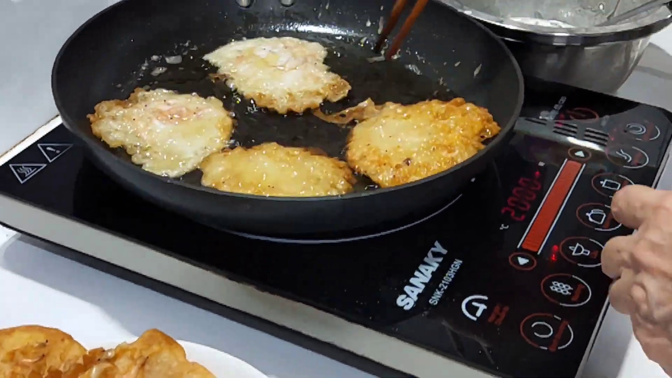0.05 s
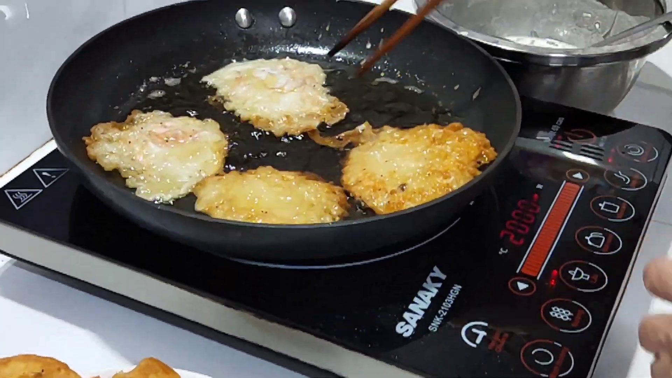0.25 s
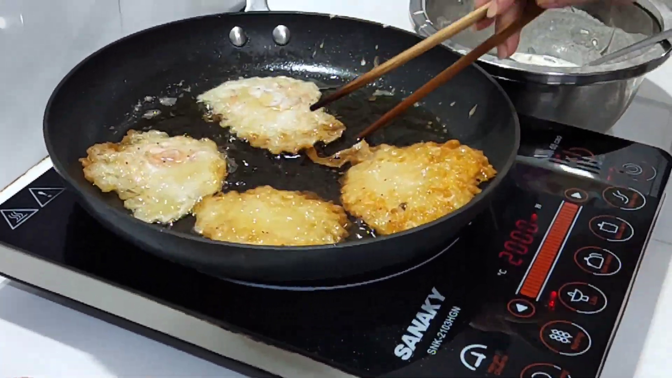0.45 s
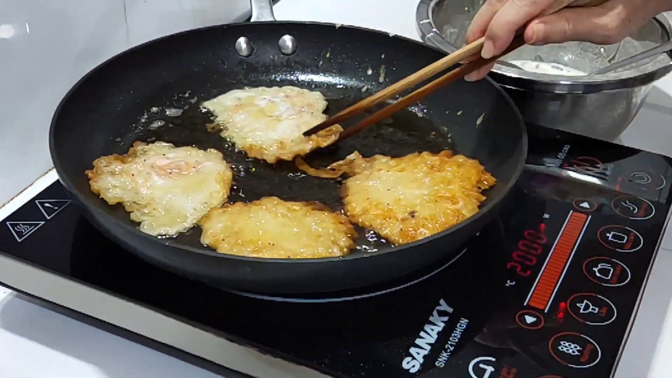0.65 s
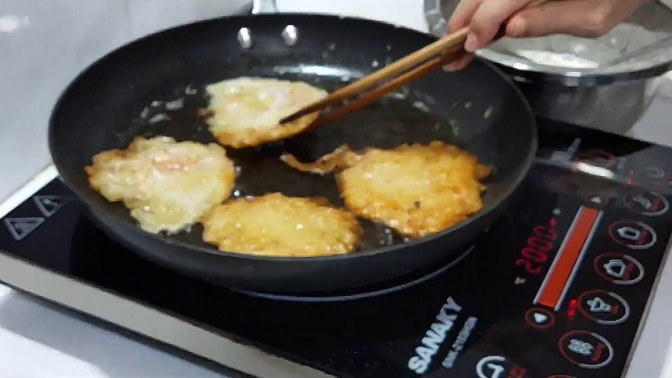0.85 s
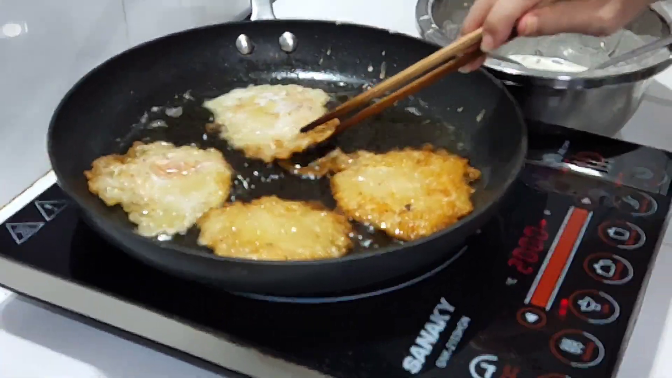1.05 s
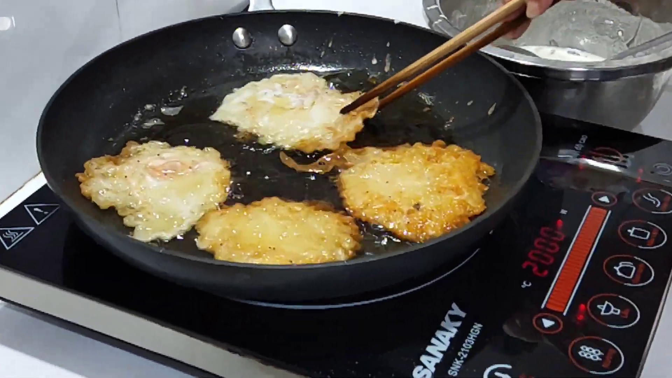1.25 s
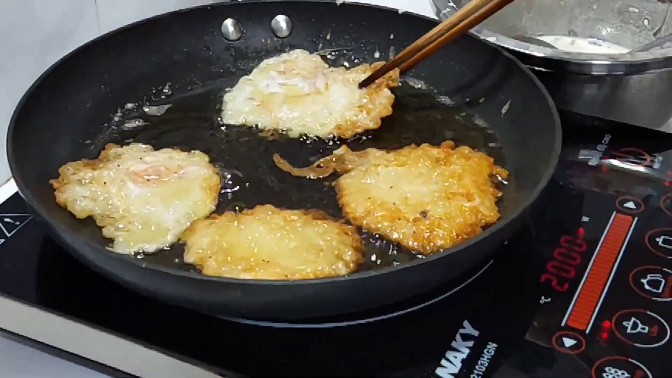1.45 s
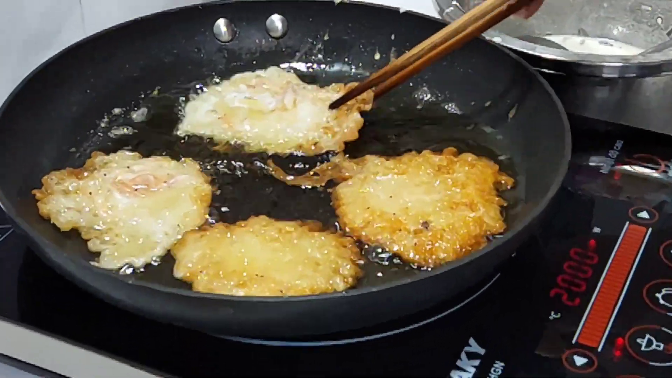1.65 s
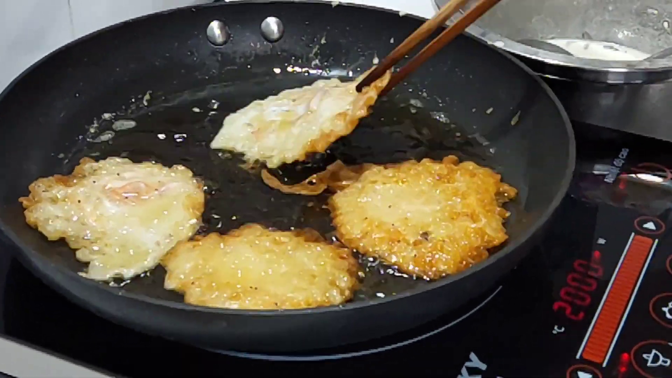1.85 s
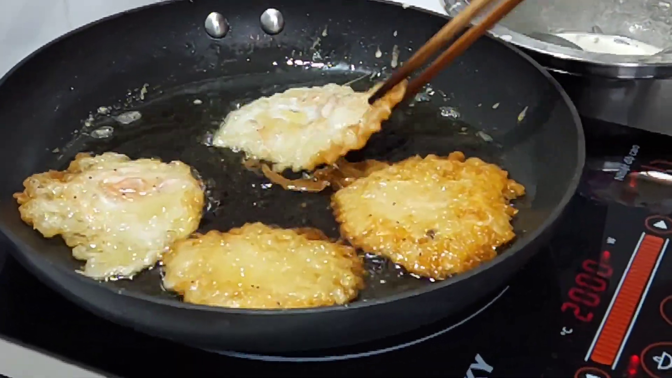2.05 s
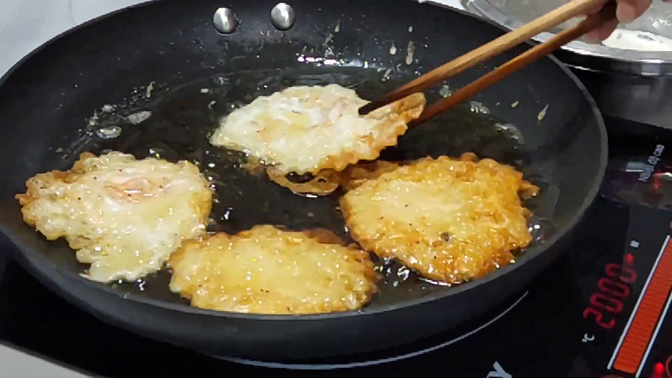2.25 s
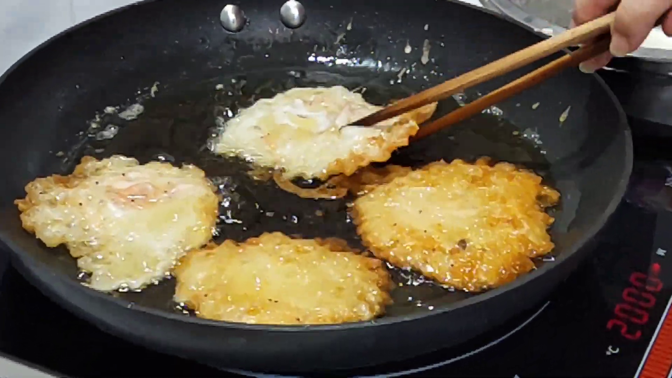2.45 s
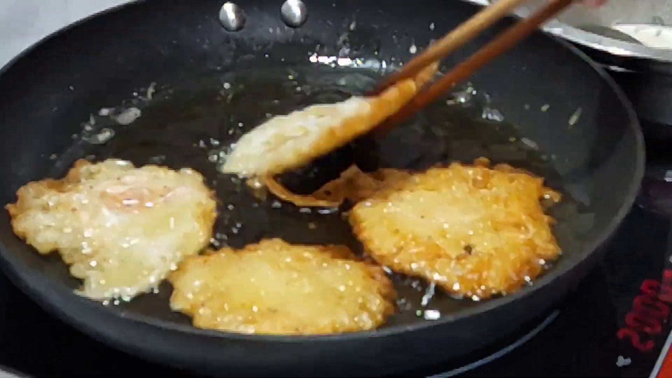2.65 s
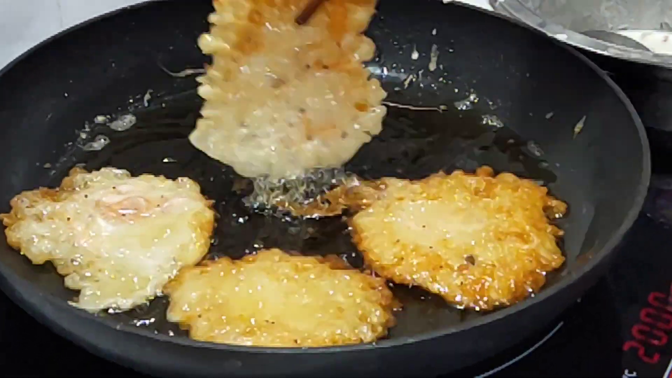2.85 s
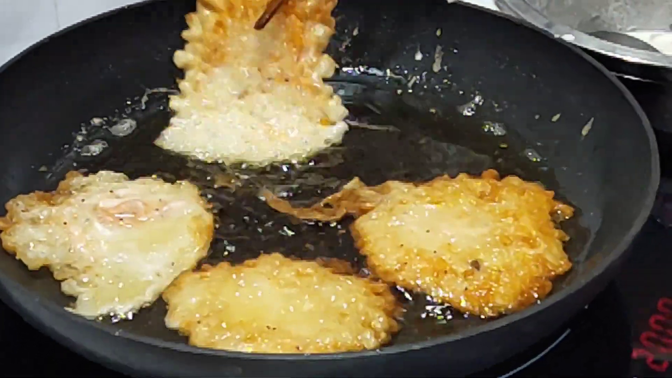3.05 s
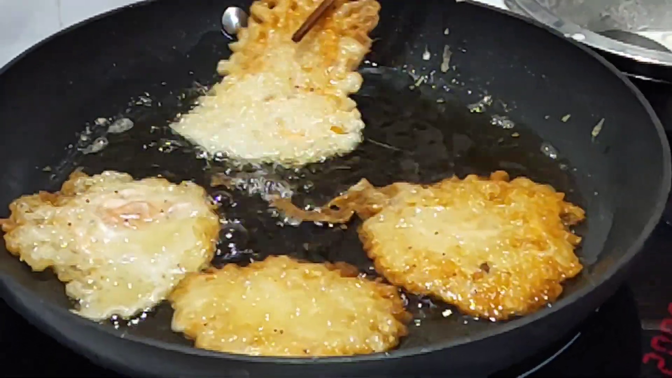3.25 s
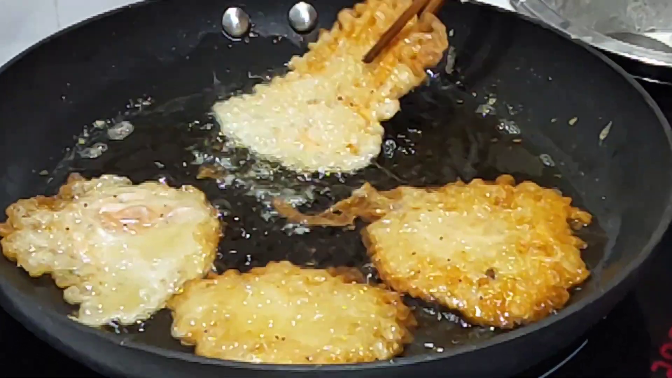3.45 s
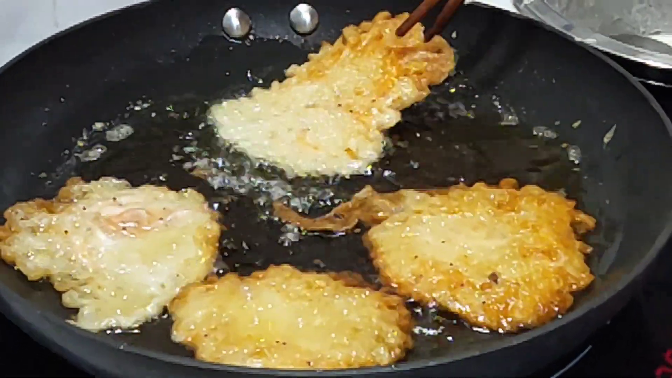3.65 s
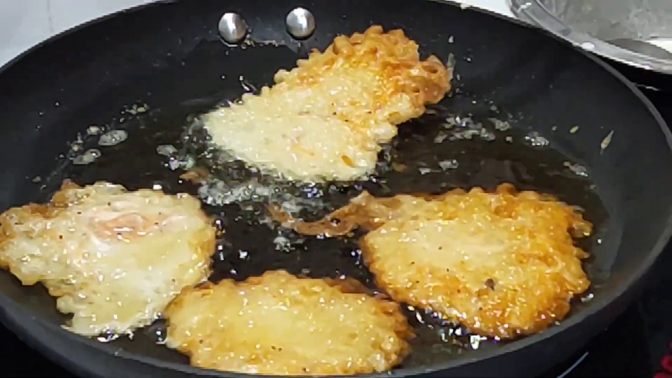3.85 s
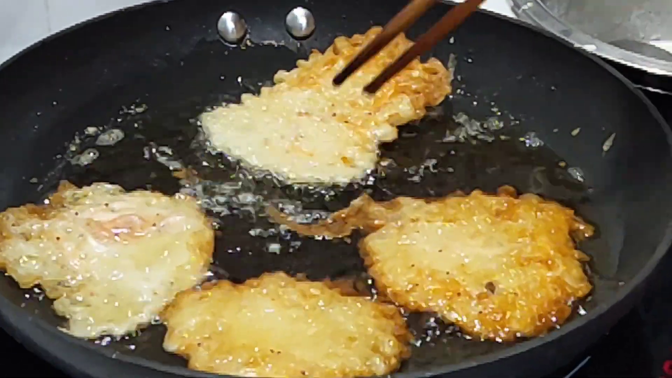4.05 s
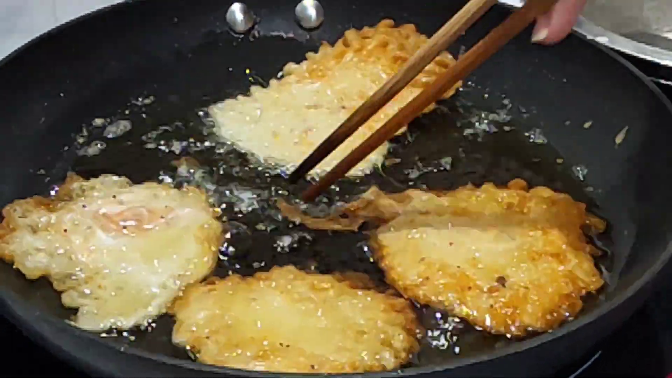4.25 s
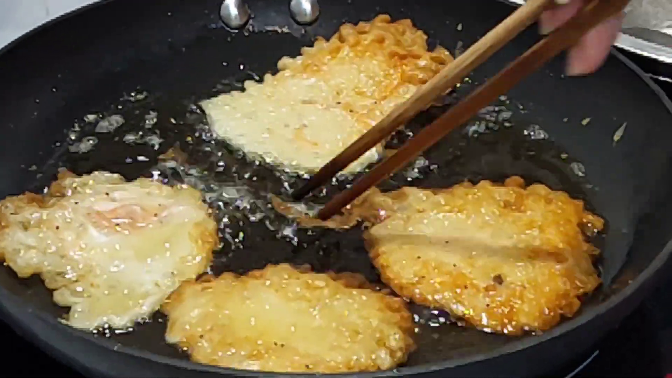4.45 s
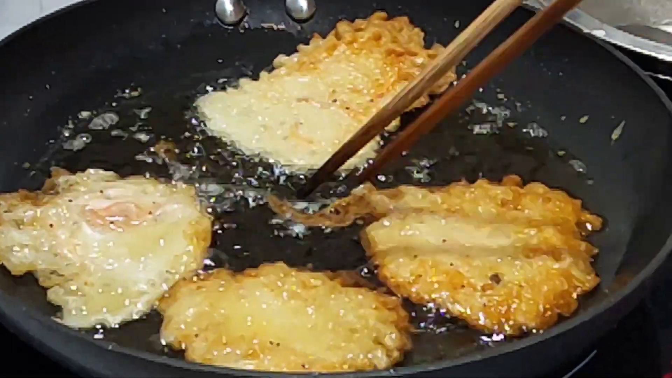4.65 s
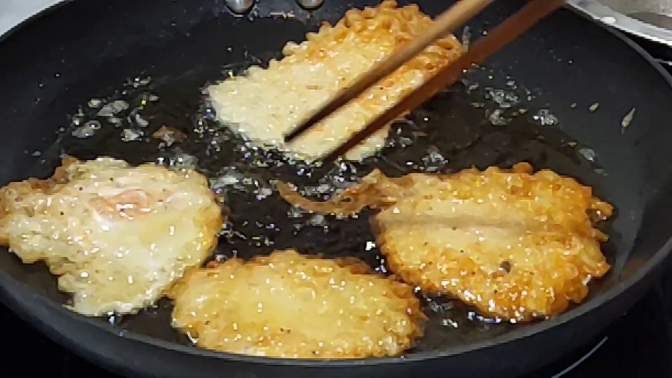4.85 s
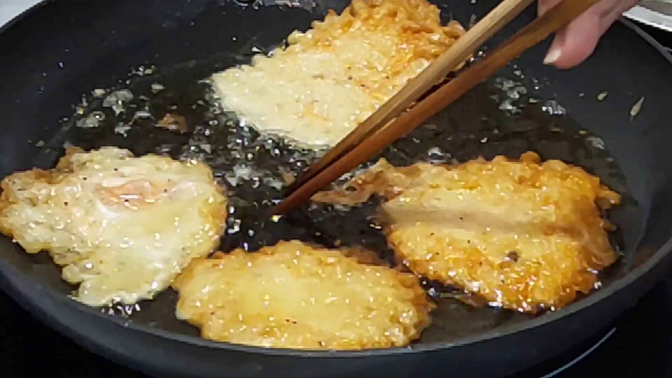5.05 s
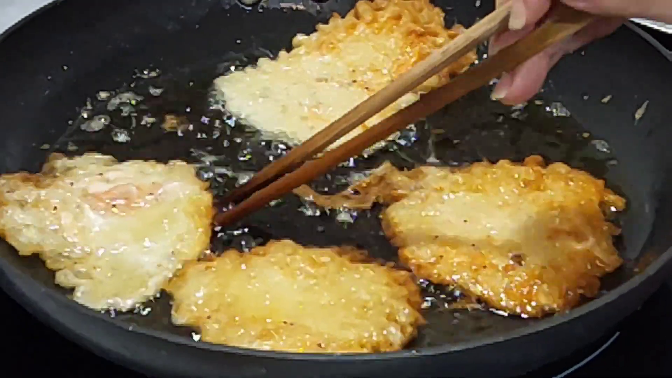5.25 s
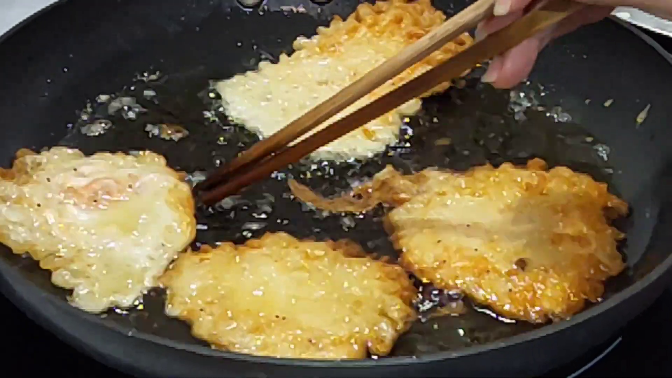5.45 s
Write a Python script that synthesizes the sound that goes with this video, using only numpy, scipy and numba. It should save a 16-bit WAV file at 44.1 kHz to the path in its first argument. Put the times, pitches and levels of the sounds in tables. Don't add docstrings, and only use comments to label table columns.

```python
import sys
import numpy as np
from scipy import signal
from scipy.fft import rfft, irfft
from scipy.io import wavfile
from scipy.ndimage import uniform_filter1d
from numba import njit

SR = 44100
rng = np.random.default_rng(int(sys.argv[2]) if len(sys.argv) > 2 else 0)


def how_loud(loudness_db):
    steps = np.asarray(loudness_db, float) / 20
    return 10 ** steps


def to_wav(sig):
    pcm = np.clip(np.atleast_2d(sig), -1, 1) * 32767
    pcm = np.round(pcm).astype(np.int16)
    wavfile.write(sys.argv[1], SR, pcm.T)


N = 242991
T = np.arange(N) / SR
HZ = np.fft.rfftfreq(N, 1 / SR)


def set_rms(x, db):
    return x * how_loud(db) / np.sqrt(np.mean(x ** 2))


def across(table, hz):
    table_hz, value = np.transpose(table)
    return np.interp(np.log(hz + 1), np.log(table_hz + 1), value)


def walk(rate_hz):
    hold = int(SR / rate_hz)
    levels = rng.standard_normal(int(60 * N / SR))[:N // hold + 1]
    steps = np.repeat(levels, hold)
    return 0.933 * uniform_filter1d(uniform_filter1d(steps, hold), hold)[:N]


# hz, likeness (0-1)
PORT_LIKENESS = [(30, 0.6), (120, 0.9), (240, 0.95), (490, 0.86), (1000, 0.42), (2000, 0)]


def diffuse_pair(gain):
    like = np.clip(across(PORT_LIKENESS, HZ), 0, 1)
    mid, side = rfft(rng.standard_normal((2, N))) * gain * np.sqrt([1 + like, 1 - like])
    return irfft(np.array([mid + side, mid - side]), N)


# start_s (centre), level_db (peak), length_s
SWELLS = [
    (0.309, -52.5, 0.075),
    (0.894, -47.5, 0.3),
    (1.544, -51.5, 0.2),
    (2.56, -52, 0.13),
    (3.387, -51.5, 0.074),
    (4.583, -41, 0.26),
    (5.235, -47, 0.25),
]


def rumble():
    band = 1 / (1 + ((HZ - 85) / 22) ** 4)
    swells = sum(how_loud(db) * np.exp(-((T - s) / length) ** 2) for s, db, length in SWELLS)
    floor_db = -69
    return set_rms(diffuse_pair(band), -6.5) * (how_loud(floor_db) + swells)


# hz, level_db (per Hz)
FAN_AIR = [(12, -40), (30, -19), (70, -25.5), (150, -22.5), (190, -13), (350, -8.5), (395, -14.5),
           (440, -11), (600, -11), (800, -9.5), (990, -19), (1100, -24.5), (1630, -20), (3000, -34.5)]
# pitch_hz, width_hz, level_db
FAN_CASING = [(69.6, 4.9, -13.5), (90.4, 2.3, -15), (238.5, 18, -5), (302, 29, -4.5), (329.6, 9.7, -5.5),
              (410, 40, -8.5), (464.3, 10.3, -4), (523.3, 6.1, -4.5), (725, 73, -13), (816, 5.5, -10),
              (921.6, 11, -8)]


def fan_air():
    rings = sum(how_loud(db) ** 2 / (1 + (2 * (HZ - hz) / width) ** 4) for hz, width, db in FAN_CASING)
    colour = np.sqrt(how_loud(across(FAN_AIR, HZ)) ** 2 + rings)
    return set_rms(diffuse_pair(colour), -34.5) * how_loud(0.6 * walk(3))


# pitch_hz, level_db (rms)
FAN_TONES = [
    (200.3, -48.5),
    (407.5, -43),
    (968.3, -53),
]


def fan_tones():
    tones = 0
    for hz, db in FAN_TONES:
        flicker_db, drift = 2.2 * walk(16), 0.004 * walk(5)
        phase = 2 * np.pi * np.cumsum(hz * (1 + drift)) / SR
        tones = tones + np.sqrt(2) * how_loud(db + flicker_db) * np.sin(phase)
    return tones


# pitch_hz, level_db, t60_s
BOWL = [(1562, -22.5, 0.086), (1890, -4.5, 0.036), (2100, -0.5, 0.046), (2515, -14, 0.12),
        (2785, -5, 0.054), (3080, -6.5, 0.059)]


def paths(bowl_db, rim_db, rim_t60, kitchen_db, kitchen_t60, lags, count):
    t = np.arange(SR // 2) / SR

    def fade(t60):
        return np.exp(-np.log(1000) * t / t60)

    tail = how_loud(rim_db) * fade(rim_t60) + how_loud(kitchen_db) * fade(kitchen_t60)
    h = rng.standard_normal((count, 2, len(t))) * tail
    swell = 1 - np.exp(-t / 0.0019)
    for hz, db, t60 in BOWL:
        own_hz = hz * (1 + 0.0094 * rng.standard_normal((count, 2, 1)))
        turns = own_hz * t + rng.random((count, 2, 1))
        h += how_loud(bowl_db + db) * swell * fade(t60) * np.sin(2 * np.pi * turns)
    lag = (lags * rng.random((count, 2))).astype(int)
    h[np.arange(count)[:, None], np.arange(2), lag] += 1
    return h


@njit
def burst(s, hz, gain, spot, cycles, swell, glide, out):
    for e in range(len(s)):
        start = int(s[e] * SR) + 1
        for i in range(start, min(start + int(cycles[e] * SR / hz[e]), out.shape[2])):
            age = (i / SR - s[e]) * hz[e] / cycles[e]
            phase = 2 * np.pi * age * cycles[e] * (1 + glide * age)
            v = (1 - np.exp(-age / swell)) ** 2 * np.exp(-6 * age) * np.sin(phase)
            out[spot[e], 0, i] += gain[0, e] * v
            out[spot[e], 1, i] += gain[1, e] * v
    return out


def bubbles(s, db, hz, pan_db, snap_db, snap_hz, cycles, swell, glide, way, count=4):
    chance = rng.random((len(s), 2 + 2 * count)).T
    gain = how_loud(db + np.array([pan_db, -pan_db]) / 2)
    spot = (chance[0] * len(way)).astype(int)
    own_cycles = cycles * (0.5 + 0.87 * chance[1])
    dry = burst(s, hz, gain, spot, own_cycles, swell, glide, np.zeros((len(way), 2, N)))
    snap_gain = gain * how_loud(snap_db - 2.0)
    for k, (late, pitch) in enumerate(chance[2:].reshape(count, 2, -1)):
        pitch = (k + pitch) / count
        own_hz = snap_hz * (0.62 + 0.8 * pitch)
        dry = burst(s + 0.003 * late, own_hz, snap_gain, spot, 8.0 + 0 * s, 0.074, 0.2, dry)
    return signal.fftconvolve(dry, way, axes=2)[..., :N].sum(0)


def fizz(sizes, boil_db, pan_db, scatter_db, patchy_db, cycles, way, count):
    when, pitch, luck, side = rng.random((count, 4)).T
    s = when * (N - 1) / SR
    hz = sizes[0][0] * (sizes[-1][0] / sizes[0][0]) ** pitch
    loud_db = np.minimum(-scatter_db * np.log(luck), 4.5 * scatter_db)
    patch_db = patchy_db * walk(35)[(s * SR).astype(int)]
    db = across(sizes, hz) + loud_db + patch_db
    x = bubbles(s, db, hz, 6 * (side - 0.5), -17.5, 5500.0, cycles, 0.039, 0.23, way, count=1)
    return set_rms(x, 0) * how_loud(boil_db + np.array([pan_db, -pan_db]) / 2)


# pitch_hz, level_db
FINE = [(2800, -21), (3400, -15.5), (4300, -1), (5000, -1), (5600, -4.5), (6500, 5.5), (7500, 0.5),
        (8500, 4.5)]
# pitch_hz, level_db
COARSE = [(900, -14.5), (1300, -14.5), (1700, 3.5), (2100, 2.5), (2600, -4.5), (3300, 4)]


def whole_pan_fizz(vigour_db):
    wide = paths(-32.5, -26.5, 0.047, -45, 0.23, lags=30, count=7)
    pan_db = -4.5 - 0.07 * vigour_db
    fine_db = -46 + vigour_db
    coarse_db = -49 + 0.6478 * vigour_db
    fine = fizz(FINE, fine_db + 2.0, pan_db, 3.1, 0.97, 9.1, wide, count=15000)
    coarse = fizz(COARSE, coarse_db + 2.0, pan_db, 1.45, 4.4, 8.6, wide, count=9000)
    return fine + coarse


def strays(simmer_db, per_db, spread_db, low_hz, high_hz, vigour_db, count):
    late, size, pitch, side = rng.random((count, 4)).T
    s = (np.arange(count) + late) / count * (N - 1) / SR
    db = simmer_db + per_db * vigour_db[(s * SR).astype(int)] + spread_db * (size - 0.5)
    return s, db, low_hz * (high_hz / low_hz) ** pitch, -1.5 + 5.5 * (side - 0.5)


# start_s, level_db (peak), pitch_hz, pan_db (left minus right)
SIMMER_SPITS = [(0.0867, -20.5, 4180, -1), (0.171, -15.5, 3990, -1.5), (0.2767, -22, 3920, -1.5),
                (0.5067, -27.5, 4230, 10), (0.59, -15.5, 6000, -4.5), (0.6344, -26.5, 4100, -14),
                (0.7502, -22.5, 5320, 0), (0.7778, -19, 4250, -8), (0.899, -26, 6340, -13.5),
                (1.021, -17, 4900, -7), (1.0575, -12, 4330, -5.5), (1.1416, -21, 6600, -11),
                (1.189, -21, 5400, 0), (1.2626, -26, 3260, -17), (1.303, -21.5, 5400, -3),
                (1.3946, -19.5, 6170, -9), (1.4655, -19.5, 6900, -9), (1.5879, -21, 6020, -7.5),
                (1.689, -20.5, 7200, -10), (1.8363, -19, 5370, -13.5), (1.8716, -12, 4250, -8),
                (1.909, -17, 4000, -5), (1.953, -18.5, 4780, -5), (2.0701, -12.5, 5860, -10.5),
                (2.172, -21.5, 6400, -6), (2.219, -16.5, 5960, -6.5), (2.3133, -20.5, 3550, -8.5),
                (2.3755, -27, 6800, -17), (2.4884, -20.5, 4740, -4), (2.5073, -13, 5130, -6)]
# start_s, level_db, pitch_hz, pan_db
SPITS = [(3.7607, -10, 4540, -1), (2.6526, -18, 5580, -4), (2.774, -13, 4300, -4.5),
         (2.843, -12.5, 6670, -9), (2.9288, -20.5, 6470, -10), (2.9486, -18, 5510, -1.5),
         (2.9898, -15, 6450, -8), (3.04, -21, 5660, -16), (3.1781, -11, 4860, 1),
         (3.1496, -10.5, 4620, -8.5), (3.3842, -10, 6100, 5.5), (3.521, -6.5, 3900, -5.5),
         (3.7332, -7, 6970, -2), (3.8576, -19, 6360, 6.5), (3.8998, -9, 4180, -4),
         (3.9332, -15.5, 6580, -19), (4.144, -9, 7170, -7), (4.318, -19, 4000, 15),
         (4.401, -10.5, 6230, -14.5), (4.9158, -8, 5000, -5.5), (4.9805, -8.5, 4180, -8),
         (5.0534, -16.5, 6500, -14.5), (5.076, -14, 6850, -0.5), (5.0927, -8, 3500, -4),
         (5.223, -10.5, 5020, 1), (5.258, -9, 6000, -9), (5.3165, -7.5, 5520, -4.5),
         (5.3526, -13, 5950, -18.5), (5.3952, -8, 4700, -6.5), (4.496, -5, 5300, -6)]


def spits(vigour_db, way):
    small = strays(-26.5, 0.56, 3.5, 4399, 7501, vigour_db, count=110)
    events = np.hstack([np.transpose(SIMMER_SPITS + SPITS), small])
    return how_loud(8.0) * bubbles(*events, -1.8, 6220.0, 18.5, 0.076, 0.065, way)


# start_s, level_db, pitch_hz, pan_db, snap_db
SIMMER_POPS = [(0.0353, -14, 2330, -7, -16), (0.308, -12.5, 2800, -7, -13), (0.6365, -26.5, 2730, -4, 2.5),
               (0.6638, -18, 2610, -7, -4), (0.7778, -37.5, 2080, -5, 10.5),
               (1.1405, -16.5, 2900, -5.5, -5), (1.2623, -18.5, 2100, -6, 0), (1.3942, -15, 2820, -2.5, -3),
               (1.8706, -21, 2540, -4, 3.5), (2.2106, -31, 1910, -4, 1), (2.314, -33, 2150, -3, 6),
               (2.6533, -27.5, 2720, -11, -1.5)]
# start_s, level_db, pitch_hz, pan_db, snap_db
POPS = [(3.053, -7, 2240, -9, -18), (3.1566, -4, 2020, -7, -13), (3.1906, -14.5, 2080, -10, -17),
        (3.242, -12.5, 2580, -10, -1), (3.3897, -8.5, 2090, -11, -13), (3.5902, -14, 2050, -4, -9),
        (3.616, -15.5, 2470, -5.5, 3), (3.6471, -15.5, 2210, -8.5, -10.5), (3.7055, -14.5, 2160, -10, -5),
        (3.7334, -14, 2180, -5, -4), (3.8528, -9.5, 1850, -0.5, -9), (3.926, -23, 1880, -3, 6),
        (3.9451, -13.5, 1890, 2.5, -5), (4.1451, -8.5, 1910, -3, -10.5), (4.4004, -9.5, 2030, 1, -15),
        (4.6107, -19, 2500, -4.5, -3), (4.637, -7, 2020, -7, -8), (4.8234, -6.5, 1907, 0, -25),
        (4.8526, -12.5, 2060, 3, -22), (4.9171, -12, 2160, -3, -5), (4.9651, -6, 1900, 7.5, -20),
        (5.004, -7.5, 2030, -0.5, -22), (5.274, -24, 2500, -7, 5), (5.431, -5.5, 2270, -6.5, -9.5)]
# start_s, level_db, pitch_hz, pan_db, snap_db
KNOCKS = [
    (3.3886, -25.5, 1140, -1.5, -17),
    (5.1895, -21, 1400, -3, -9),
    (5.193, -20.5, 924, -1, -5),
]
# start_s, level_db, pitch_hz, pan_db, snap_db
AFTERPOPS = [
    (3.8714, -11.5, 2380, -2, -8.5),
    (4.1564, -12, 1856, 1.5, -18),
    (4.8184, -17, 1860, 0, -20),
    (4.9824, -15, 2150, 0, -19),
    (5.0234, -19.5, 2100, 11, -11),
]


def pops(vigour_db, way):
    small = strays(-42.5, 0.9471, 7.5, 1854, 2501, vigour_db, count=50)
    stray_snap_db = -7 + 0 * small[0]
    clear = np.transpose(SIMMER_POPS + POPS + KNOCKS + AFTERPOPS)
    events = np.hstack([clear, [*small, stray_snap_db]])
    return how_loud(12.0) * bubbles(*events, 3355.0, 12.8, 0.16, 0.045, way)


# start_s, level_db
BOIL = [(0.0, -45), (0.2, -50.5), (0.8, -45), (1.4, -47), (1.73, -47.5), (1.92, -42.5), (2.16, -49),
        (2.5, -46), (2.81, -43), (3.0, -41), (3.13, -30.5), (3.17, -28), (3.32, -23), (3.7, -25.5),
        (4.17, -25), (4.4, -24.5), (4.69, -27.5), (5.29, -28.5), (5.51, -27.5)]


def frying():
    vigour_db = np.interp(T, *np.transpose(BOIL)) + 46
    facing = paths(-36.5, -27, 0.04, -40, 0.45, lags=4, count=5)
    return whole_pan_fizz(vigour_db) + spits(vigour_db, facing) + pops(vigour_db, facing)


def scene():
    return rumble() + fan_air() + fan_tones() + frying()


def band_limit(x):
    return signal.sosfilt(signal.butter(12, 8830, fs=SR, output="sos"), x)


# hz, level_db (left minus right)
PORTS = [(60, -2), (100, 4), (180, 2), (310, 3.5), (530, 3), (920, 2.5), (1600, 6.5), (2760, 7), (4760, 9),
         (8230, -7)]
# hz, level_db
TOP = [(6800, 0), (7400, -4), (7750, -12), (8050, -34.5), (8400, -60), (9500, -66.5), (12000, -70),
       (16000, -90)]


def record(dry):
    rounded = np.tanh(0.81 * dry) / 0.79
    tilt = across(PORTS, HZ) / 2
    colour = how_loud([tilt, -tilt] + across(TOP, HZ))
    port_lag_s = 0.00006
    late = np.exp(-1j * np.pi * HZ * port_lag_s * np.array([[1], [-1]]))
    mix = irfft(rfft(rounded) * colour * late, N)
    return band_limit(mix)


dry = scene()
out = record(dry)
to_wav(out)
```